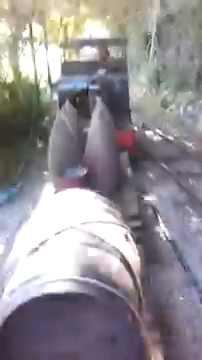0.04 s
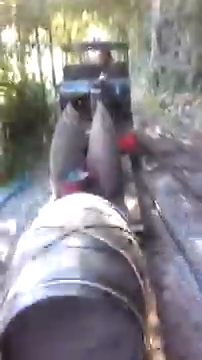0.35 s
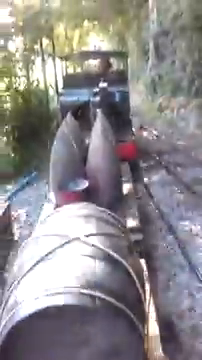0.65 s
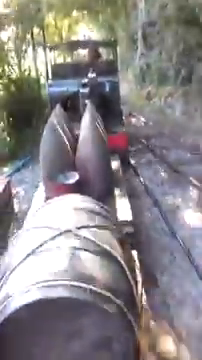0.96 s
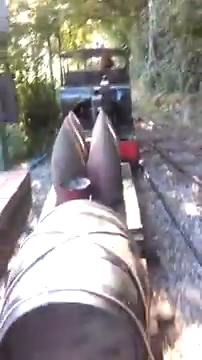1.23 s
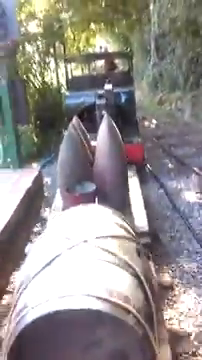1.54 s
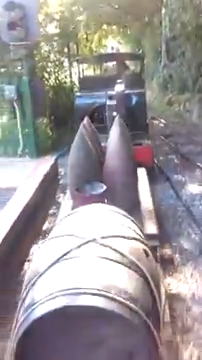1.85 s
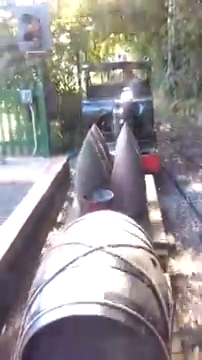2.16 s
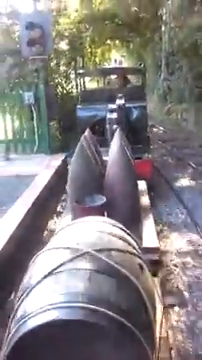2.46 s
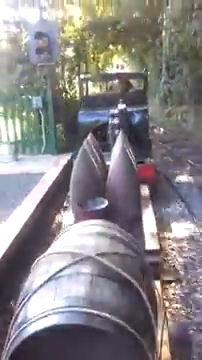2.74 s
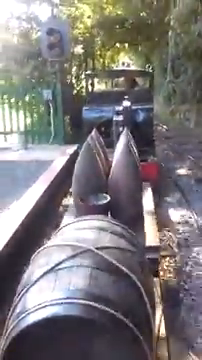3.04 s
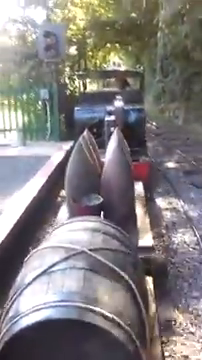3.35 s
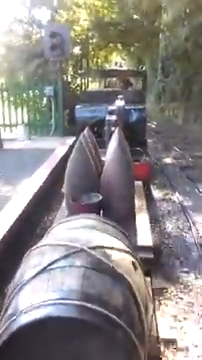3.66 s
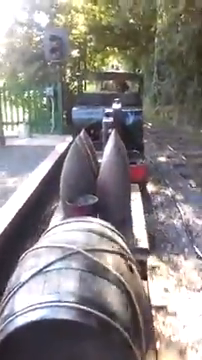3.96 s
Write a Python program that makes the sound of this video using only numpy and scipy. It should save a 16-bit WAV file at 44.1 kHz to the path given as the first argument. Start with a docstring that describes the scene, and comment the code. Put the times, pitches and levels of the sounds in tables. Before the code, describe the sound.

A loaded railway wagon rumbles steadily throughout, heard from on board, its frame booming and wheels roaring on rough rails. Wooden thuds and cargo clatter fill the first second. Heavier bumps come around 1.5 seconds and sharp jolts just after 2. From about 2.5 to 3.3 seconds the clatter thickens and iron couplings clank several times. Lighter knocks follow until nearly 4 seconds, with faint metal ticks and hiss.

```python
"""A loaded narrow-gauge wagon rumbles and bumps over uneven track, rolling steadily behind a small
locomotive. One microphone rides on the wagon, in the open air. Close by, the frame booms, the wooden
deck drones and thuds, and the wheels roar on rough rails. Loose couplings and cargo clatter and clank
in short bouts, and small metal parts tick over a faint hiss."""
import sys
import numpy as np
from scipy import signal
from scipy.fft import rfft, irfft
from scipy.io import wavfile

SR = 44100
rng = np.random.default_rng(int(sys.argv[2]) if len(sys.argv) > 2 else 0)


def generate_wav(signal):
    """Clip the signal to [-1, 1] and save it as 16-bit WAV at the path in sys.argv[1]."""
    frames = np.transpose(np.atleast_2d(signal))
    scaled = np.clip(frames, -1, 1) * 32767
    pcm = np.round(scaled).astype(np.int16)
    wavfile.write(sys.argv[1], SR, pcm)


N = 176400

# Rumble of the frame under the microphone. Each row: frequency in Hz, relative level in dB.
RUMBLE_SPECTRUM = [(20, -43), (33, -26.5), (42, -22), (52, -5), (75, -1), (105, -3.5), (128, -3), (195, -6),
                   (265, -14.5), (400, -44.5), (1000, -90.5)]
# Resonances of frame and deck. Each row: frequency in Hz, width in Hz, level in dB.
FRAME_MODES = [(82.4, 10, -31), (101.6, 7.3, -29.5), (160.6, 25, -39)]
# Wheel bumps, bunched about once a turn. Each row: centre in seconds, level in dB, pitch in Hz.
WHEEL_BUMPS = [(.108, -16, 92), (.152, -15, 82), (.213, -16, 72.5), (0.431, -15.5, 83.6), (.533, -18, 86),
               (.857, -17, 80), (0.915, -18, 93), (0.985, -14.5, 80), (1.237, -17.5, 86),
               (1.414, -16, 96.4), (1.477, -12.5, 85), (1.521, -9, 94), (1.578, -15, 88.4),
               (1.628, -14.5, 96.3), (2.116, -16, 100), (2.196, -14, 101), (1.724, -19, 95),
               (2.808, -15, 88.4), (2.912, -15, 84), (3.041, -15, 86), (3.578, -15.5, 91),
               (3.695, -18, 91.7)]
# Resonances of the deck. Each row: frequency in Hz, width in Hz, level in dB.
DECK_MODES = [(277.8, 30, -43.5), (321.4, 36, -37.5), (362, 81, -42), (436.3, 140, -39), (541, 92, -51.5)]
# Rise and fall of the deck's drone. Each row: time in seconds, relative level in dB.
DRONE_CURVE = [(0, -27.5), (1.15, -31.5), (1.45, -29), (1.8, -33), (2.15, -29.5), (2.9, -28.5), (3.95, -33)]
# Thuds of the deck. Each row: peak time in seconds, level in dB, pitch in Hz.
DECK_THUDS = [(.122, -16, 180), (.326, -17, 168.5), (.586, -16, 168.5), (.795, -17, 156), (0.885, -20, 182),
              (0.952, -20.5, 175), (1.31, -25.5, 327), (1.425, -27, 447), (1.44, -23, 325),
              (1.532, -25, 330), (2.122, -16.5, 189), (2.395, -25, 305), (2.684, -19.5, 185),
              (2.876, -15.5, 170.6), (3.016, -16, 158), (3.105, -18.5, 158), (3.224, -22.5, 191)]
# Roar of the wheels below. Each row: frequency in Hz, relative level in dB.
ROAR_SPECTRUM = [(100, -10), (350, 3), (600, 1.5), (800, -3), (1100, -10), (1650, -16.5), (2000, -17),
                 (2270, -22), (2750, -21.5), (3300, -32), (4200, -37), (6000, -47), (15000, -75)]
# Roughness of the rails. Each row: time in seconds, relative level in dB.
RAIL_ROUGHNESS = [(0, -40.5), (.09, -49.5), (.15, -43.5), (.3, -42), (.45, -47.5), (.62, -48.5), (.82, -43),
                  (1.0, -48.5), (1.37, -50), (1.46, -46), (1.98, -51.5), (2.18, -45), (2.45, -50.5),
                  (2.56, -47.5), (2.81, -50), (2.9, -44), (3.1, -48), (3.3, -45.5), (3.47, -51.5),
                  (3.7, -48.5), (3.95, -48)]
# Rattle of small parts. Each row: frequency in Hz, relative level in dB.
RATTLE_SPECTRUM = [(1500, -20), (2800, 0), (4800, 0), (5600, -9), (6350, -1), (7100, -8), (8600, -7),
                   (11000, -16), (15500, -28)]
# Jolts of couplings and cargo.
# Each row: start in seconds, level in dB, decay in seconds, brightness in dB per octave.
JOLTS = [(.128, -24, 0.03, -5), (.168, -34, 0.054, -3), (0.201, -45.5, .1, 1), (.251, -38.5, .015, 1),
         (.272, -41, 0.076, -3.5), (.329, -38, 0.034, -3), (.38, -37, .02, -2.5), (.58, -48.5, 0.055, 2.5),
         (.627, -41.5, 0.016, 2), (.655, -35.5, .018, -4.5), (.735, -41, .05, -9), (.806, -37, .022, -4),
         (.927, -45, 0.037, 0), (.985, -38, 0.028, -2.5), (1.071, -47, 0.024, 0.5), (1.327, -38, .028, -9),
         (1.425, -41, 0.075, -2.5), (1.52, -46, 0.12, 2), (2.029, -32, .03, -5), (2.161, -30, 0.055, -4.5),
         (2.47, -46.5, 0.023, 2), (2.555, -42.5, 0.062, 0), (2.618, -43, 0.015, -2.5),
         (2.668, -37.5, 0.015, -2.5), (2.715, -37, 0.077, -3), (2.838, -35, 0.034, -3.5),
         (2.888, -33, 0.022, -7.5), (2.961, -38.5, 0.034, -2.5), (3.022, -39, 0.066, -3.5),
         (3.048, -33.5, 0.064, -4.5), (3.174, -27, 0.027, -4.5), (3.388, -41.5, 0.014, -2),
         (3.585, -37, .04, -5), (3.682, -36.5, 0.022, -3), (3.79, -37.5, 0.02, -3.5)]
# Tone of their clatter. Each row: frequency in Hz, relative level in dB.
CLATTER_SPECTRUM = [(150, -22), (450, 0), (850, -1), (1400, -6), (2050, -6), (2800, -15), (3500, -28),
                    (6500, -37), (10000, -44), (15500, -58)]
# A coupling snapping taut. Each row: start in seconds, level in dB, ring brightness in dB per octave.
COUPLING_SNAPS = [(2.53, -37, 5), (2.875, -31, -1), (3.026, -35, -3), (3.076, -32.5, 0), (3.33, -33, -3)]
# Modes of the coupling. Each row: frequency in Hz, relative level in dB.
COUPLING_MODES = [(807, 7), (953, -4), (1147, -1), (1292, -4.5), (1572, -12.5), (1760, -10), (1960, -5.5)]
# Ticks of small metal parts.
# Each row: start in seconds, level in dB, ring pitch in Hz, ring against splash in dB.
METAL_TICKS = [(.187, -61, 6300, 0), (.25, -65, 4540, -8), (.285, -56.5, 5080, -3), (.839, -64, 5030, 15),
               (1.086, -55, 3520, -2), (1.881, -57, 4160, -8), (1.896, -63, 4550, -11),
               (2.873, -69, 4600, 5), (3.052, -56.5, 6400, -5), (3.146, -56, 4780, -8),
               (3.516, -56.5, 4720, -2.5), (3.684, -61, 4070, -8)]
# Background hiss. Each row: frequency in Hz, relative level in dB.
HISS_SPECTRUM = [(1000, 0), (4800, 0), (5500, -3), (6300, 0), (7100, -2), (8700, -1.5), (9200, -4),
                 (10200, -4), (11000, -7), (11900, -7), (13000, -10.5), (15500, -15)]

RUMBLE_DB, ROAR_DB, RATTLE_DB, HISS_DB = -21, -39, -70.5, -66.8
TILT_PIVOT_HZ = 1000


def frame_rumble():
    """Under the microphone the frame booms all the time and swings for a few cycles at each bump."""
    out = amp(RUMBLE_DB) * colour(rng.standard_normal(N), RUMBLE_SPECTRUM)
    out += sum(amp(db) * ringing(hz, width, N) for hz, width, db in FRAME_MODES)
    t = np.arange(SR // 2) / SR
    swell = np.exp(-.5 * ((t - t.mean()) / .014) ** 2)
    for centre, db, hz in WHEEL_BUMPS:
        add(out, centre - t.mean(), amp(db) * shaped(swing(hz, len(t), width_hz=23), swell))
    return out


def deck():
    """The wooden deck drones and thuds under its load."""
    drone = sum(amp(db) * ringing(hz, width, N) for hz, width, db in DECK_MODES)
    out = amp(around_mean(DRONE_CURVE)) * drone
    rise_s = .00836
    for peak, db, hz in DECK_THUDS:
        thud = blow(swing(hz, SR // 2, width_hz=57.6), rise_s, decay_s=.023)
        add(out, peak - rise_s, amp(db) * thud)
    return out


def wheels():
    """Just below, rough rails make the wheels roar and keep small parts rattling."""
    rough_db = around_mean(RAIL_ROUGHNESS)
    flutter_db = .87 * waver(low_hz=4.5, high_hz=30)
    roar = colour(ironwork(rng.standard_normal(N)), ROAR_SPECTRUM)
    roar *= amp(ROAR_DB + .62 * rough_db + flutter_db)
    rattle = colour(impacts(per_s=450, spread_db=2.6, size=N), RATTLE_SPECTRUM)
    rattle *= amp(RATTLE_DB + rough_db + flutter_db)
    return roar + rattle


def ironwork(x):
    """The many faint modes of the wagon's ironwork add a dense, short ring."""
    t = np.arange(SR // 5) / SR
    ring = rng.standard_normal(len(t)) * np.exp(-t / .014)
    ring /= np.linalg.norm(ring)
    return x + amp(-11) * irfft(rfft(x) * rfft(ring, N), N)


def clatter():
    """Each jolt of couplings and cargo sets off a dying burst of dense small impacts."""
    out = np.zeros(N)
    for start, db, decay_s, bright_db in JOLTS:
        hits = impacts(per_s=1000, spread_db=2, size=SR // 2)
        burst = colour(hits, CLATTER_SPECTRUM, bright_db)
        add(out, start, amp(db) * blow(burst, rise_s=.0038, decay_s=decay_s))
    return out


def clanks():
    """Iron strikes iron at the wagon's end: a crack and the short ring of the coupling."""
    out = np.zeros(N)
    t = np.arange(SR // 2) / SR
    for start, db, bright_db in COUPLING_SNAPS:
        ring = np.zeros(len(t))
        for hz, mode_db in COUPLING_MODES:
            gain = amp(mode_db + bright_db * np.log2(hz / TILT_PIVOT_HZ))
            ring += gain * np.sin(2 * np.pi * (hz * t + rng.random()))
        crack = colour(rng.standard_normal(len(t)), CLATTER_SPECTRUM)
        add(out, start, amp(db) * blow(unit(ring) + crack, rise_s=.003, decay_s=.026))
    return out


def ticks():
    """Light metal contacts nearby: a splash of treble and one short ring."""
    out = np.zeros(N)
    for start, db, hz, ring_db in METAL_TICKS:
        splash = colour(rng.standard_normal(SR // 2), RATTLE_SPECTRUM, tilt_db=-3)
        ring = amp(ring_db) * swing(hz, SR // 2, width_hz=220)
        add(out, start, amp(db) * blow(splash + ring, rise_s=.001, decay_s=.015))
    return out


def hiss():
    """A faint, steady hiss lies behind everything."""
    return amp(HISS_DB) * colour(rng.standard_normal(N), HISS_SPECTRUM)


def ringing(hz, width_hz, size):
    """A steep-sided resonance shaken at random; rms 1."""
    detune = (np.fft.rfftfreq(size, 1 / SR) - hz) / (width_hz / 2)
    return unit(irfft(rfft(rng.standard_normal(size)) / (1 + .5 * detune ** 2) ** 2, size))


def swing(hz, size, width_hz, steadiness=.85):
    """A resonance that wanders in pitch more than in strength; rms 1."""
    analytic = signal.hilbert(ringing(hz, width_hz, size))
    return unit(analytic.real / (abs(analytic) + .1) ** steadiness)


def impacts(per_s, spread_db, size, ring_s=.006):
    """Small impacts of uneven strength on four parts, each with its own short ring; rms 1."""
    t = np.arange(SR // 20) / SR
    out = np.zeros(size)
    for _ in range(4):
        struck = rng.random(size) < per_s / SR / 4
        strength = amp(spread_db * np.minimum(rng.exponential(1, size), 4))
        ring = rng.standard_normal(len(t)) * np.exp(-t / ring_s)
        out += signal.oaconvolve(struck * strength, ring)[:size]
    return unit(out)


def colour(x, spectrum, tilt_db=0):
    """Filters by a spectrum and a tilt per octave; rms 1."""
    hz = np.fft.rfftfreq(len(x), 1 / SR) + 1
    points_hz, points_db = np.transpose(spectrum)
    db = np.interp(np.log(hz), np.log(points_hz), points_db) + tilt_db * np.log2(hz / TILT_PIVOT_HZ)
    return unit(irfft(rfft(x) * amp(db), len(x)))


def waver(low_hz, high_hz):
    """Random drift; rms 1."""
    t = np.arange(0, N, 100) / SR
    rates = np.geomspace(low_hz, high_hz, num=20)
    drift = sum(np.sin(2 * np.pi * (hz * t + rng.random())) / np.sqrt(hz) for hz in rates)
    return unit(np.interp(np.arange(N) / SR, t, drift))


def blow(x, rise_s, decay_s):
    """Quick rise and exponential decay."""
    t = np.arange(len(x)) / SR
    return shaped(x, np.minimum(t / rise_s, 1) * np.exp(-np.maximum(t - rise_s, 0) / decay_s))


def shaped(x, envelope):
    """Lays an envelope on a sound, keeping the energy that the envelope sets."""
    return unit(x * envelope) * np.sqrt(np.mean(envelope ** 2))


def around_mean(curve):
    """A level curve in dB around its mean, one value per sample."""
    times, db = np.transpose(curve)
    return np.interp(np.arange(N) / SR, times, db - db.mean())


def add(mix, start_s, sound):
    """Mixes a sound in at a time."""
    first = round(start_s * SR)
    sound = sound[max(-first, 0):]
    part = mix[max(first, 0):][:len(sound)]
    part += sound[:len(part)]


def amp(db):
    """Decibels to gain."""
    return 10 ** (np.asarray(db) / 20)


def unit(x):
    """Scales to rms 1."""
    return x / np.sqrt(np.mean(x ** 2) + 1e-20)


def scene():
    """Everything as heard from the wagon, in the open air, in mono."""
    return (hiss() + frame_rumble() + deck() + wheels() + clatter() + clanks() + ticks())[None]


def record(dry):
    """The microphone's bass cut at 38 Hz, 4 ms fades at the ends, then a band limit at 15.7 kHz."""
    t = np.arange(N) / SR
    fades = np.sin(np.pi / 2 * np.minimum(np.minimum(t, t[::-1]) / .004, 1)) ** 2
    bass_cut = signal.butter(N=4, Wn=38, btype="high", fs=SR, output="sos")
    band_limit = signal.firwin(511, 15700, window=("kaiser", 9), fs=SR)
    return signal.oaconvolve(signal.sosfilt(bass_cut, dry) * fades, band_limit[None], "same")


dry = scene()
out = record(dry)
generate_wav(out)
```